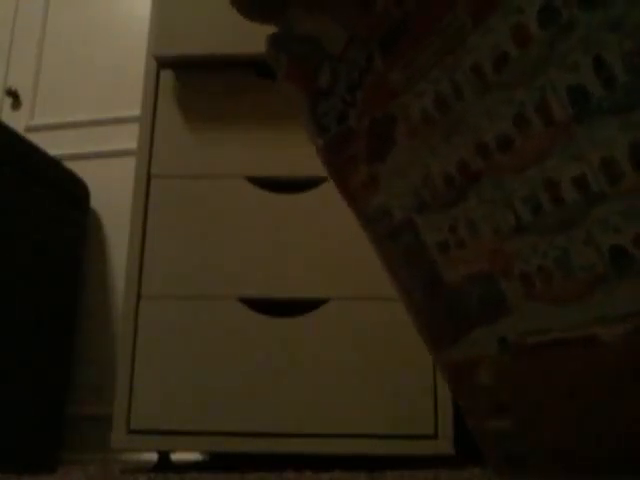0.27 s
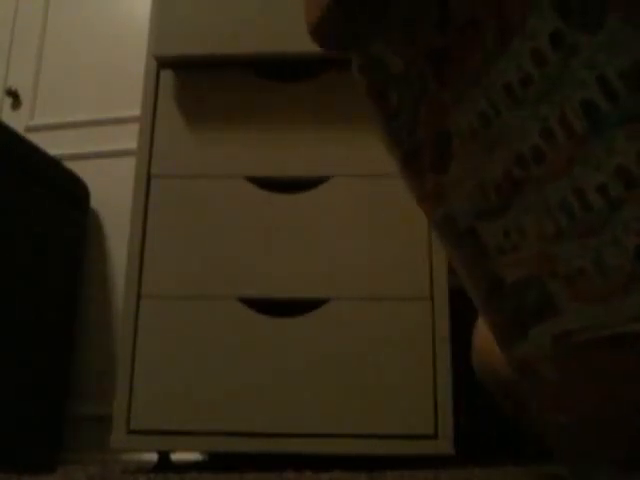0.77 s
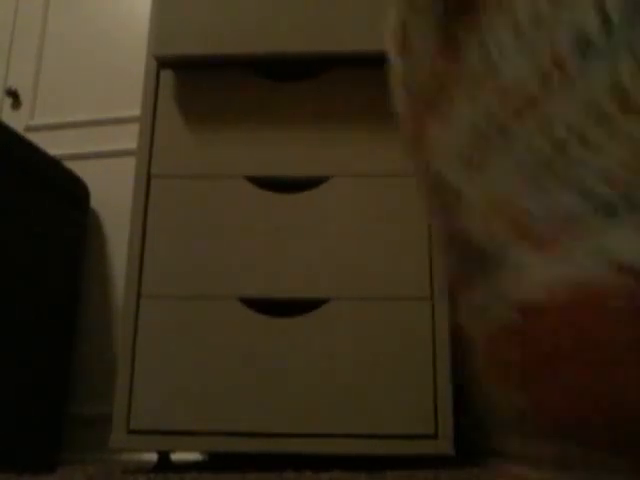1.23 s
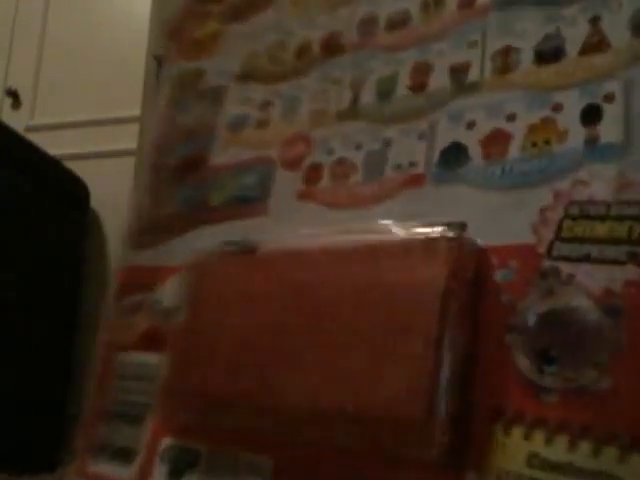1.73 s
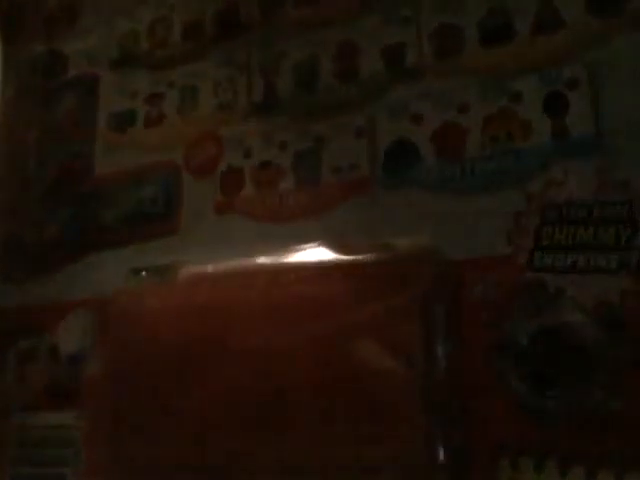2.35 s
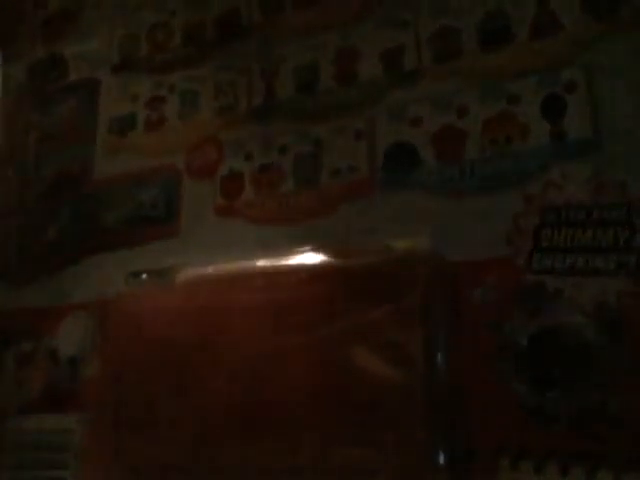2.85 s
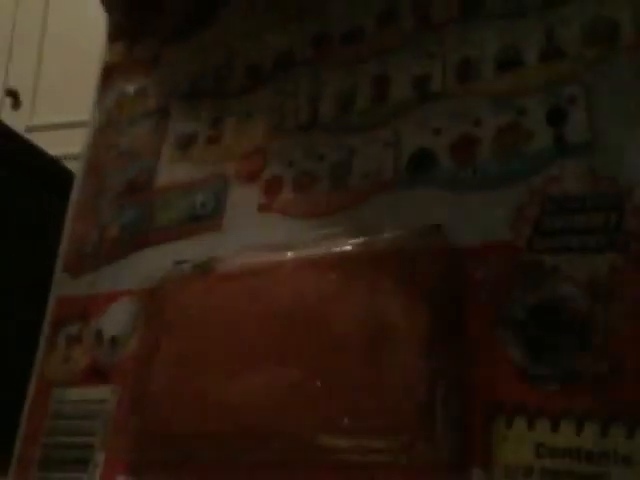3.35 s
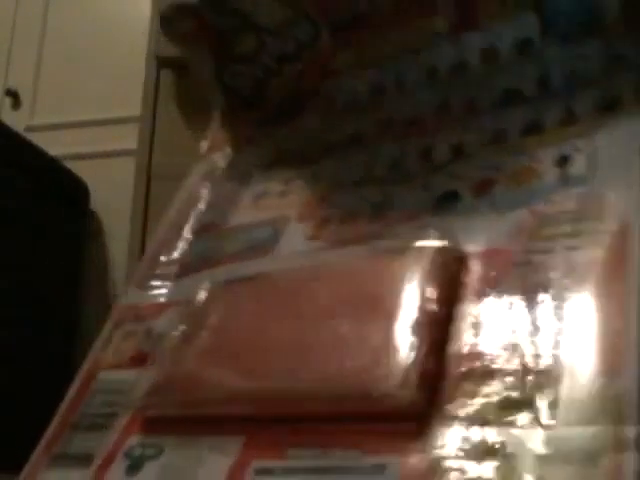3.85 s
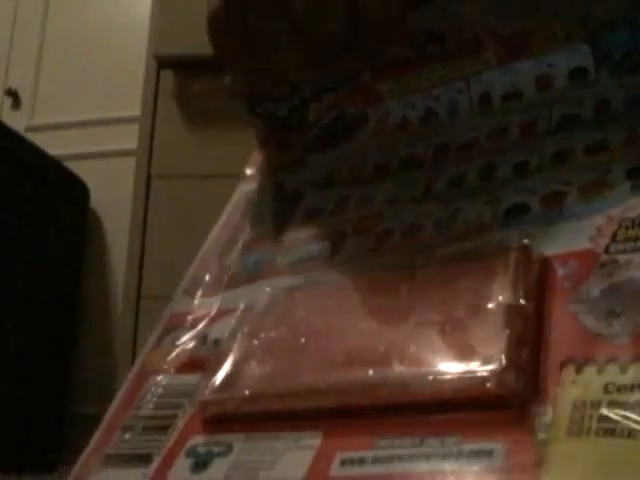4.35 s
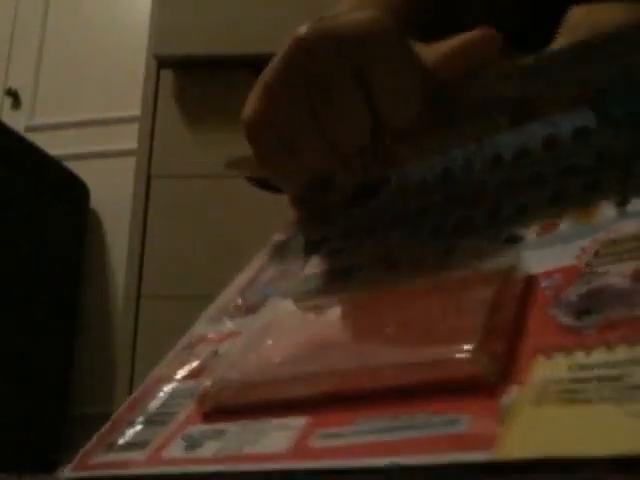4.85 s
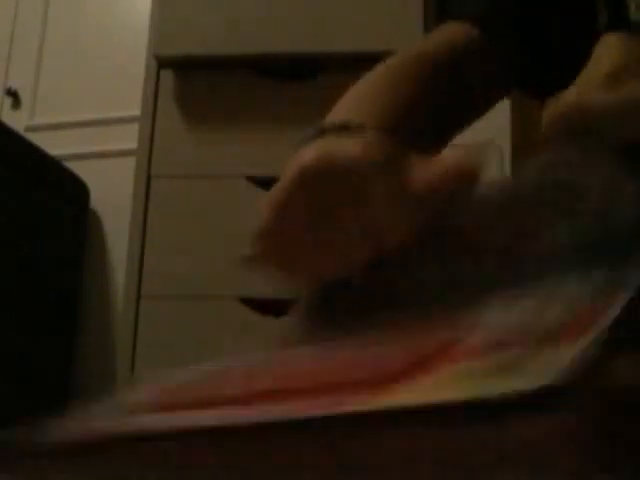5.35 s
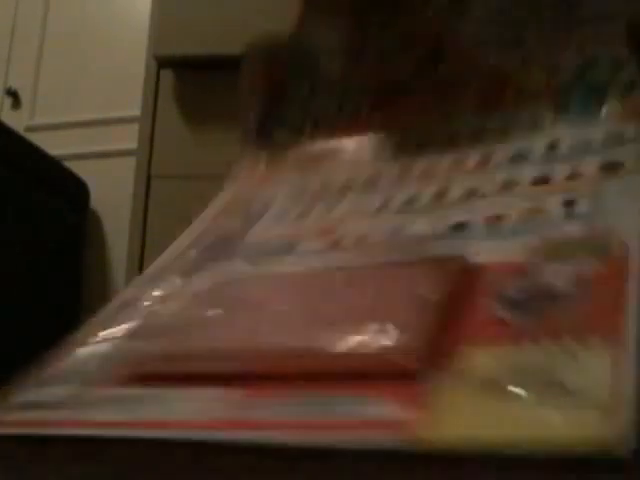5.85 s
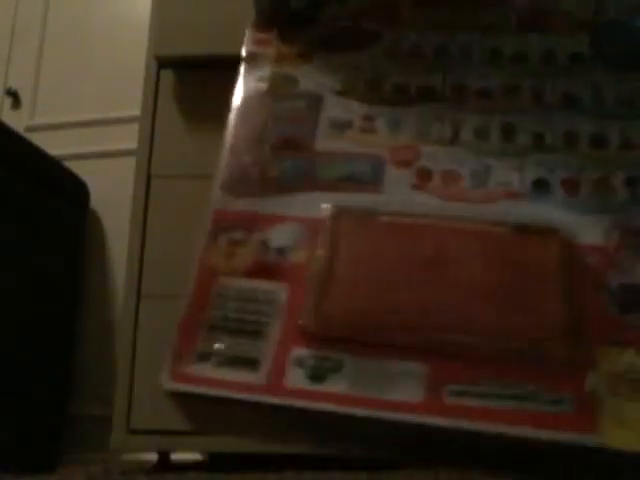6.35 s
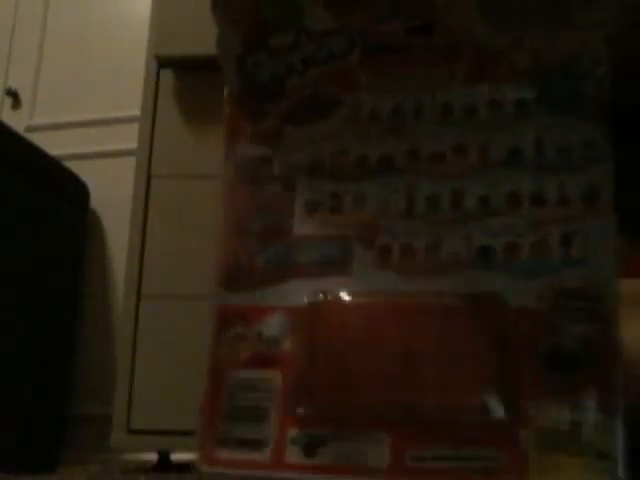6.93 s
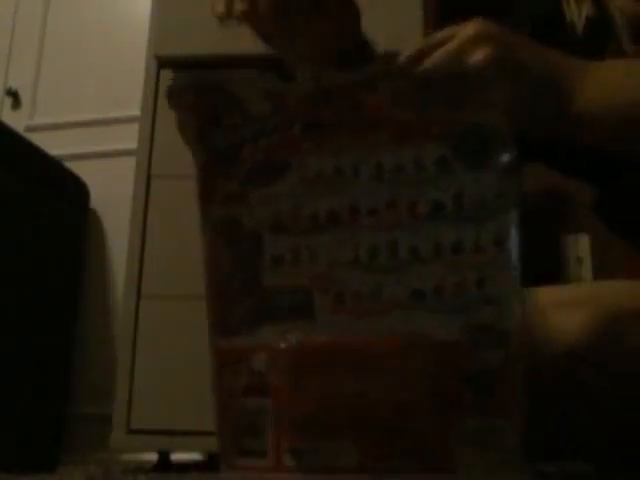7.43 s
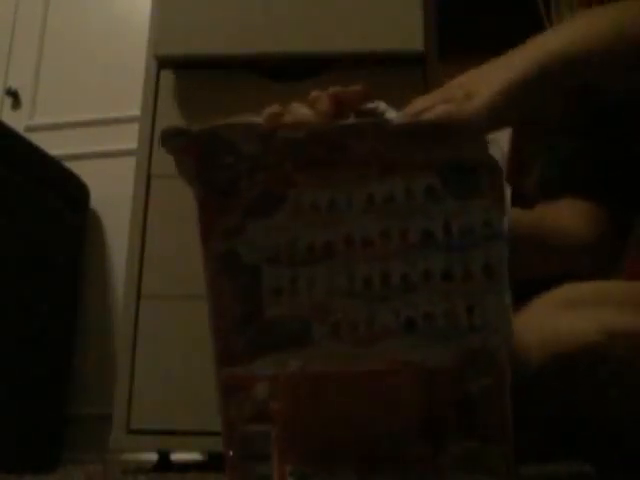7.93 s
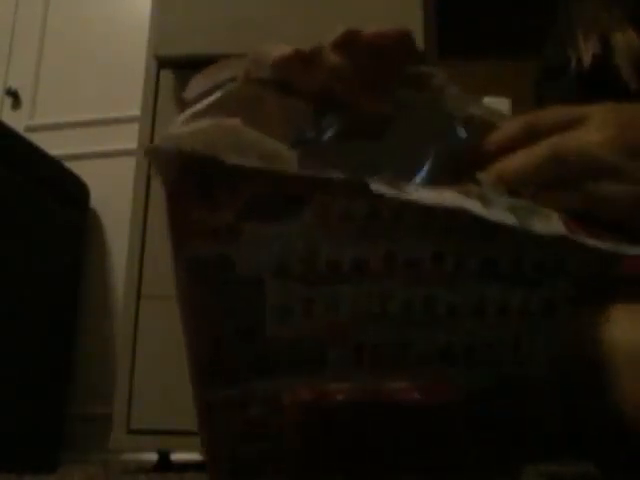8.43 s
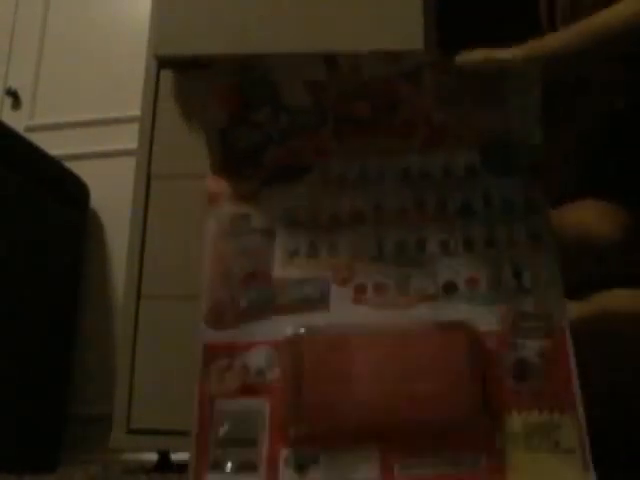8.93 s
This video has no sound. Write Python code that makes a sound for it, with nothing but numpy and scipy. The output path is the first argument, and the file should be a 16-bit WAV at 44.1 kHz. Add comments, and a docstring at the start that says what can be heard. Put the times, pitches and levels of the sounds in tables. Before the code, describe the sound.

Hands bend, peel and tug a plastic-and-card toy package close to the microphone, with crinkles, sharp pops, cracks and short rips in a small room.

```python
"""Hands bend, peel and tear a carded blister pack close to one microphone in a small carpeted room.
Creases that give way set the resonances of card, blister and film ringing: pops, cracks and ticks.
Random small creases and rubbing make the rustle and the rips; jolts make the card creak, gliding
bands of noise are sliding fingers, single notes are panels that pop. Feedback delays give the room;
shaped noise gives the faint hum and hiss below."""
import sys
import numpy as np
from scipy import signal
from scipy.fft import rfft, irfft, next_fast_len
from scipy.io import wavfile
from scipy.ndimage import uniform_filter1d

SR = 44100
rng = np.random.default_rng(int(sys.argv[2]) if len(sys.argv) > 2 else 0)


def unload_audio(sound):
    """Save the sound as a 16-bit wav file, at the path given as the first command line argument."""
    columns = np.transpose(np.atleast_2d(sound))
    # keep every value between -1 and 1, then stretch to whole-number steps
    steps = np.round(np.clip(columns, -1, 1) * 32767)
    wavfile.write(sys.argv[1], SR, steps.astype(np.int16))


N = 404397

# creases that give way, levels ahead of the resonances: t/s, film tick level/dB, card pop level/dB
CREASES = [(0.045, -53, -38.5), (0.115, -53, -42), (0.1984, -36.5, -32.5), (0.322, -70, -34.5),
           (0.334, -37.5, -66), (0.369, -25, -28.5), (0.383, -25, -60), (0.469, -35.5, -39.5),
           (0.514, -26, -61), (0.5874, -31, -48), (0.596, -26, -45), (0.61, -18, -65),
           (0.635, -30.5, -39.5), (0.689, -21, -38), (0.705, -27, -35.5), (0.893, -37, -42),
           (1.2937, -29, -54), (1.483, -49, -39.5), (1.492, -20.5, -33.5), (1.5907, -57, -30.5),
           (1.612, -42, -39.5), (1.6976, -57, -33.5), (1.8, -64, -38.5), (1.889, -42, -30),
           (1.9055, -25.5, -20), (1.9715, -45, -26.5), (2.112, -63, -28), (2.2132, -61, -37),
           (2.252, -63.5, -40.5), (2.278, -49, -43), (2.286, -50, -27), (2.329, -67, -36.5),
           (2.3692, -69, -32), (2.4105, -70, -32.5), (2.4386, -46, -36), (2.543, -18.5, -40),
           (2.5663, -26, -28.5), (2.5913, -59, -31.5), (2.639, -29, -41.5), (2.667, -39, -33),
           (2.677, -15, -53), (2.72, -47, -40.5), (2.7584, -66, -30.5), (2.801, -31.5, -39),
           (2.871, -56.5, -34.5), (2.9125, -30, -34), (2.9403, -23.5, -49), (3.007, -10.5, -9),
           (3.0166, -15.5, -1.5), (3.0238, -11.5, -14), (3.058, -11, -13), (3.067, -12, -18),
           (3.0742, -24.5, -6), (3.085, -10, -32), (3.093, -10, -39), (3.108, -16.5, -32.5),
           (3.079, -17.5, -18), (3.1232, -31.5, -26.5), (3.1494, -23, -16), (3.171, -7, -27),
           (3.165, -40, -15), (3.186, -48, -19), (3.3259, -28.5, -33), (3.3514, -16, -28),
           (3.396, -29.5, -33), (3.4624, -33.5, -29.5), (3.534, -17.5, -28.5), (3.6355, -17.5, -31),
           (3.7628, -11.5, -12.5), (3.9506, -20, -30.5), (3.954, -17.5, -15), (3.9815, -18.5, -50),
           (4.0107, -25, -36), (4.0241, -20, -26), (4.0564, -23, -31.5), (4.095, -25, -28.5),
           (4.102, -27.5, -29.5), (4.126, -19, -29), (4.2015, -27, -28.5), (4.254, -20, -29),
           (4.3034, -26.5, -41), (4.3361, -29, -33), (4.3845, -12, -35), (4.477, -7.5, -6),
           (4.6454, -39, -31), (4.682, -36.5, -29), (4.763, -10.5, -16.5), (4.81, -19, -29.5),
           (4.815, -31, -21), (4.824, -16.5, -17), (4.861, -29, -11), (4.881, -16, -41.5),
           (4.893, -1.5, -7.5), (4.92, -7.5, -8), (5.0526, -29.5, -35), (5.218, -24, -25.5),
           (5.2561, -11, -71.5), (5.289, -22, -47.5), (5.3449, -7.5, -26), (5.3507, -6.5, -23),
           (5.4932, -23, -64), (5.653, -48, -23.5), (5.7032, -12, -71), (5.8195, -30, -42),
           (5.9371, -28, -46), (5.98, -53, -28.5), (6.117, -37.5, -51), (6.2705, -17, -34.5),
           (6.4408, -35, -61), (6.488, -40, -44), (6.51, -30.5, -41), (6.561, -37.5, -44.5),
           (6.69, -30.5, -67), (6.7147, -43, -41.5), (6.889, -33, -37.5), (6.897, -42.5, -27.5),
           (6.99, -29, -31.5), (7.227, -43.5, -38), (7.2358, -31, -32.5), (7.2965, -33, -27.5),
           (7.314, -35.5, -44.5), (7.3541, -23, -29), (7.3963, -44.5, -31.5), (7.4241, -36, -30),
           (7.633, -37.5, -42.5), (7.7104, -23.5, -26.5), (7.9289, -22, -30), (8.0593, -36.5, -41),
           (8.24, -30.5, -34.5), (8.267, -34, -36.5), (8.278, -31.5, -41.5), (8.407, -36, -35),
           (8.446, -41, -38.5), (8.491, -50, -25), (8.504, -54, -38.5), (8.804, -20.5, -20),
           (8.8351, -30.5, -31.5), (8.99, -36.5, -26), (9.006, -28, -21.5), (9.033, -46, -32.5),
           (9.1151, -6, -18), (9.128, -10.5, -40.5)]
# resonances of the card: f/Hz, level/dB, t60/s
CARD_MODES = [(167, -6.5, 0.16), (267.6, 2.5, 0.029), (381.7, 1.5, 0.028), (520, 6, 0.011), (710, 8, 0.011),
              (850, 7, 0.011), (1080, 5, 0.013), (1197, 6, 0.0085), (1537, 5, 0.0072)]
# tugs that make the sheets rustle or rip: start t/s, hold t/s, film level/dB, blister level/dB,
# card level/dB, bent card f/Hz
PULLS = [(0.201, 0.017, -40, -64, -39.5, 764), (0.36, 0.06, -40, -49.5, -42.5, 814),
         (0.572, 0.088, -56, -46, -50.5, 600), (0.665, 0.066, -41.5, -43, -41.5, 770),
         (1.216, 0.041, -52.5, -54.5, -49, 466), (1.29, 0.051, -53, -49.5, -61, 750),
         (1.901, 0.021, -50.5, -53.5, -39, 540), (1.99, 0.059, -52.5, -56, -40, 384),
         (2.525, 0.052, -49.5, -45.5, -50, 1010), (2.634, 0.075, -38, -71.5, -53.5, 650),
         (3.013, 0.0044, -11, -19.5, -18, 620), (3.025, 0.049, -24, -30.5, -18.5, 980),
         (3.152, 0.018, -50.5, -56.5, -31.5, 666), (3.208, 0.0093, -42.5, -39, -35.5, 695),
         (3.356, 0.016, -43, -40.5, -39.5, 650), (3.722, 0.055, -32, -41, -42.5, 533),
         (4.081, 0.053, -42, -49, -54, 890), (4.476, 0.0091, -25.5, -33.5, -25, 910),
         (4.668, 0.11, -49.5, -49, -41, 885), (4.78, 0.06, -37.5, -37.5, -31, 1020),
         (4.887, 0.065, -38.5, -39, -38, 710), (5.194, 0.044, -40.5, -44, -48.5, 784),
         (5.335, 0.024, -23.5, -28, -35.5, 1010), (5.371, 0.037, -32.5, -38.5, -36.5, 796),
         (5.402, 0.048, -44.5, -53, -41.5, 350), (5.617, 0.013, -41.5, -43, -47, 564),
         (5.895, 0.075, -48, -51, -46, 880), (6.271, 0.0058, -37.5, -50.5, -42.5, 950),
         (6.887, 0.03, -41, -51.5, -42, 634), (6.973, 0.013, -48, -51, -48.5, 660),
         (7.235, 0.21, -53, -50.5, -47, 760), (7.606, 0.027, -59, -54, -48.5, 660),
         (7.828, 0.025, -47, -53, -70, 670), (8.242, 0.023, -47.5, -43.5, -47, 1000),
         (8.695, 0.09, -39, -42.5, -42.5, 1040), (8.976, 0.028, -40.5, -41.5, -32.5, 480),
         (9.115, 0.011, -26.5, -46.5, -47, 660)]


def pack():
    """Film, blister and card are three sets of resonances, creased and rubbed by the same hands."""
    # resonances of the thin film: f/Hz, level/dB, t60/s
    film_modes = [(4660, 2, 0.002), (5565, 2.5, 0.0042), (6390, 8, 0.0022), (7330, 6.5, 0.0023),
                  (8270, 2.5, 0.0021), (9760, -7.5, 0.0029), (10300, -13.5, 0.0046)]
    # resonances of the stiff blister: f/Hz, level/dB, t60/s
    blister_modes = [(1900, 4, 0.0035), (2570, 4, 0.0039), (3186, 5.5, 0.0026), (4410, 3, 0.0027)]
    # steady grip, straight lines between rows: t/s, film crinkle level/dB, card rustle level/dB, bent card f/Hz
    grip = [(0.0, -59, -58, 520), (0.5, -49.5, -53.5, 635), (0.8, -66, -54, 585), (1.1, -80, -103, 520),
            (1.45, -76.5, -68, 600), (1.7, -57.5, -52.5, 490), (2.16, -56.5, -54, 520),
            (2.5, -44, -51.5, 575), (2.98, -45, -52.5, 590), (3.28, -53.5, -45.5, 680),
            (3.62, -55.5, -52, 630), (3.85, -45.5, -44.5, 700), (4.25, -39.5, -53.5, 860),
            (4.45, -46.5, -47.5, 850), (4.63, -60.5, -56, 900), (5.15, -52, -51, 796),
            (5.5, -45, -49.5, 574), (5.9, -50.5, -55, 650), (6.07, -61, -62, 606), (6.24, -62.5, -60, 603),
            (6.64, -62, -62.5, 615), (7.18, -59, -55, 692), (7.551, -82, -74, 598), (7.65, -49.5, -50, 660),
            (8.01, -49, -53, 694), (8.301, -49.5, -47, 660), (8.57, -55.5, -55.5, 710),
            (9.17, -43.5, -41.5, 700)]
    blister_like_film, blister_below_db = 0.23, 4.5   # share of the film's level in the blister's; offset

    t = np.arange(N) / SR
    grip_s, *columns = np.transpose(grip)
    film_db, card_db, card_hz = [np.interp(t, grip_s, column) for column in columns]
    blister_db = card_db + blister_like_film * (film_db - card_db) - blister_below_db

    _, _, film_tug_db, blister_tug_db, card_tug_db, _ = np.transpose(PULLS)
    film_db, _ = tugged(t, film_db, film_tug_db)
    blister_db, _ = tugged(t, blister_db, blister_tug_db)
    card_db, card_hz = tugged(t, card_db, card_tug_db, card_hz)

    _, tick_db, pop_db = np.transpose(CREASES)
    crack_db = 0.5 * tick_db + 0.46 * pop_db   # the blister shares in both
    pops = snaps(CARD_MODES, pop_db, length_ms=3.0, follow=0.022, spread_db=3.0, centre_hz=card_hz)
    cracks = snaps(blister_modes, crack_db, length_ms=3.54, follow=0.056, spread_db=3.5)
    ticks = snaps(film_modes, tick_db, length_ms=1.66, follow=0.084, spread_db=3.0)

    clumps = drift(57.0)   # one jerky motion drives all three sheets
    crinkle = rustle(film_modes, settling(film_db, tick_db - 24.0, t60=0.14), clumps,
                     per_s=1400, uneven_db=2.0, rub_db=-5, clump_db=1.6)
    crackle = rustle(blister_modes, settling(blister_db, crack_db - 32.0, t60=0.017), clumps,
                     per_s=820, uneven_db=3.0, rub_db=-7, clump_db=3.5)
    scuff = rustle(CARD_MODES, settling(card_db, pop_db - 14.5, t60=0.078), clumps,
                   per_s=300, uneven_db=4.0, rub_db=-4, clump_db=3.0, centre_hz=card_hz)
    creased = pops + cracks + ticks
    rustling = crinkle + crackle + scuff
    return creased + rustling + creaks(card_hz) + slides(t, clumps) + pings()


def snaps(modes, snap_db, length_ms, follow, spread_db, centre_hz=None):
    """A faint swell of small clicks leads into one sharp click, then a dying run of smaller ones."""
    snap_s = np.array(CREASES)[:, 0]
    lag = np.arange(-130, 900)   # samples from the sharp click
    chance = rng.standard_normal((len(snap_s), len(lag)))
    lead_in = .25 * np.exp(np.minimum(lag, 0) / 40)
    fade = np.exp(-lag / (length_ms * SR / 1000))
    # cubing leaves a few strong slips among many weak ones
    run = follow * chance ** 3 * np.where(lag < 0, lead_in, fade)
    run[:, lag == 0] = 1
    run_size = np.sqrt(np.sum(run ** 2, axis=1, keepdims=True))

    # every crease excites the modes in its own proportions
    balance = from_db(spread_db * rng.standard_normal((len(snap_s), len(modes))))
    strength = rms_one(balance, axis=1) * from_db(snap_db)[:, None] / run_size

    at = (np.round(snap_s * SR).astype(int)[:, None] + lag).ravel()
    out = 0
    for k, (hz, level_db, t60) in enumerate(modes):
        clicks = np.bincount(at, (run * strength[:, [k]]).ravel(), N + len(lag))[:N]
        sign = (-1) ** k
        out = out + sign * from_db(level_db) * ring(clicks * favoured(hz, centre_hz), hz, t60)
    return out


def rustle(modes, level_db, clumps, per_s, uneven_db, rub_db, clump_db, centre_hz=None):
    """Small creases at random, in clumps, denser under more force (a rip), over a steady rub of surfaces."""
    shift_db, shift_hz = 2.5, 9.0   # spread and corner of each mode's own swelling
    sizes = from_db(uneven_db * np.minimum(rng.exponential(1, N), 3)) * rng.choice([-1, 1], N)
    rate = per_s * from_db(.6 * np.maximum(level_db + 45.0, -9.0))   # per_s holds at -45 dB
    happens = rng.random(N) < rate / SR
    grains = rms_one(sizes * happens / np.sqrt(rate))
    out = 0
    for hz, mode_db, t60 in modes:
        # in each stretch of 16 samples the grains reach a mode or miss it
        moved = np.repeat(rng.random(N // 16 + 1) < .5, 16)[:N]
        force = grains * moved + from_db(rub_db) * rng.standard_normal(N)
        # each mode swells and fades on its own as the sheet flexes
        force = force * from_db(shift_db * drift(shift_hz))
        force = force * from_db(clump_db * clumps) * favoured(hz, centre_hz)
        out = out + from_db(mode_db) * ring(force, hz, t60)
    # level the sound over some 80 ms, so that level_db alone sets the slow course
    evened = out / np.sqrt(uniform_filter1d(out ** 2, size=3500) + 1e-12)
    return from_db(level_db) * evened


def settling(level_db, peak_db, t60):
    """After a crease gives, the sheet around it goes on rustling and dies down."""
    power = np.zeros(N)
    power[np.round(np.array(CREASES)[:, 0] * SR).astype(int)] = from_db(2 * peak_db)
    decay = np.exp(-2 * np.log(1000) / (t60 * SR))
    power = signal.lfilter([1], [1, -decay], power + 1e-18)
    return 10 * np.log10(from_db(2 * level_db) + power)


def tugged(t, steady_db, tug_db, steady_hz=0):
    """Each tug rises fast, holds and dies away over the steady level; pitch goes with the stronger force."""
    rise_db_per_s, fall_db_per_s = 2399.5, 323.5
    power = from_db(2 * steady_db)
    pitch = power * steady_hz
    for (start, hold, *_, hz), level_db in zip(PULLS, tug_db):
        near = slice(max(int((start - .1) * SR), 0), int((start + hold + .4) * SR))
        early = np.maximum(start - t[near], 0)
        late = np.maximum(t[near] - start - hold, 0)
        tug = from_db(2 * (level_db - rise_db_per_s * early - fall_db_per_s * late))
        power[near] += tug
        pitch[near] += tug * hz
    return 10 * np.log10(power), pitch / power


def favoured(hz, centre_hz):
    """Bending the card favours the modes near its pitch; without a pitch all modes are alike."""
    return 1 if centre_hz is None else from_db(-5.0 * np.log2(hz / centre_hz) ** 2)


def creaks(centre_hz):
    """Stick and slip of the card's edge: soft, nearly even jolts into the card's resonances."""
    # drags of the edge: start t/s, end t/s, slips per s, jolt level/dB
    drags = [(1.974, 2.075, 93, -35)]
    jolts = np.zeros(N)
    for start, end, per_s, level_db in drags:
        slip_s = np.arange(start, end, 1 / per_s)
        chance = rng.standard_normal((40, 2))[:len(slip_s)]
        at = ((slip_s + .0008 * chance[:, 0]) * SR).astype(int)
        jolts[at] = from_db(level_db + 2.7 * chance[:, 1])
    out = 0
    for k, (hz, level_db, t60) in enumerate(CARD_MODES):
        sign = (-1) ** k
        out = out + sign * from_db(level_db) * ring(jolts * favoured(hz, centre_hz), hz, t60)
    return out


def slides(t, clumps):
    """Fingers slide on the film: friction noise in one narrow resonance that glides, fading in and out."""
    # strokes of the fingers: start t/s, end t/s, from f/Hz, to f/Hz, level/dB
    strokes = [(0.58, 0.664, 4850, 4700, -50), (0.61, 0.669, 2680, 2065, -49),
               (1.314, 1.369, 2730, 2410, -46), (1.308, 1.368, 4550, 5260, -42.5),
               (3.861, 4.451, 2007, 2222, -49), (3.862, 4.399, 903, 970, -49),
               (5.447, 6.048, 1893, 1880, -56)]
    width, fade = 0.14, 0.09   # shares of the starting pitch and of the stroke's length
    out = 0
    for start, end, from_hz, to_hz, level_db in strokes:
        on = np.clip(np.minimum(t - start, end - t) / (fade * (end - start)), 0, 1)
        phase = 2 * np.pi * np.cumsum(np.interp(t, [start, end], [from_hz, to_hz])) / SR
        # two slow noises carried by cosine and sine make a band around the pitch
        r = np.exp(-np.pi * width * from_hz / SR)
        a, b = signal.lfilter([1], [1, -r], rng.standard_normal((2, N)) * from_db(2.5 * clumps))
        out = out + from_db(level_db) * on * rms_one(a * np.cos(phase) + b * np.sin(phase))
    return out


def pings():
    """A panel pops: each pop sets one clear note ringing briefly."""
    # popping panels: t/s, f/Hz, level/dB
    notes = [(0.657, 2250, -30), (1.371, 396, -39), (2.640, 590, -24.5), (3.217, 1760, -25),
             (3.306, 537, -39)]
    out = 0
    for s, hz, level_db in notes:
        click = from_db(level_db) * (np.arange(N) == int(s * SR))
        out = out + ring(click, hz, t60=.03)
    return out


def room(x):
    """Fourteen feedback delays stand for the reflections, duller on every round."""
    t60_s, level_db, wall_cut_hz = 0.15, -28, 12000   # t60 ahead of the dulling
    size = next_fast_len(N + SR)
    w = 2 * np.pi * np.arange(size // 2 + 1) / size
    dull = 1 / (1 + 1j * w * SR / (2 * np.pi * wall_cut_hz))
    walls = 0
    for k, lag in enumerate(np.geomspace(290, 1150, 14).astype(int)):   # delays in samples
        once = np.exp(-np.log(1000) * lag / SR / t60_s - 1j * w * lag) * dull
        walls = walls + (-1) ** k * once / (1 - once)   # sum of all rounds
    return from_db(level_db) * irfft(rfft(x, size) * walls, size)[:N]


def hum():
    """House rumble and microphone hiss: steady noise shaped by one spectrum."""
    # relative spectrum of the background: f/Hz, level/dB per Hz
    spectrum = [(30, -18), (60, -7), (110, 0.5), (250, -6.5), (430, -11), (1800, -22), (6300, -21),
                (11000, -26.5), (15000, -30)]
    spectrum_hz, spectrum_db = np.transpose(spectrum)
    hz = np.maximum(np.arange(N // 2 + 1) * SR / N, 10)
    shape = from_db(np.interp(np.log(hz), np.log(spectrum_hz), spectrum_db))
    noise = irfft(rfft(rng.standard_normal(N)) * shape, N)
    return from_db(-58.5) * rms_one(noise)


def ring(clicks, hz, t60):
    """A resonance: a unit click sets a sine of height about 1 ringing, 60 dB down after t60 seconds."""
    r = np.exp(-np.log(1000) / (t60 * SR))
    w = 2 * np.pi * hz / SR
    return signal.lfilter([0, np.sin(w)], [1, -2 * r * np.cos(w), r * r], clicks + 1e-18)


def drift(corner_hz):
    """Slow chance: coarse noise through a double one-pole low-pass; spread 1."""
    r = np.exp(-80 * np.pi * corner_hz / SR)   # one value every 40 samples
    noise = rng.standard_normal(N // 40 + 2002)
    slow = signal.lfilter([1], [1, -2 * r, r * r], noise)[2000:]   # skips the filter's start
    return np.interp(np.arange(N) / 40, np.arange(len(slow)), rms_one(slow))


def from_db(db):
    """Gain of a level."""
    return 10 ** (np.asarray(db) / 20)


def rms_one(x, axis=None):
    """Scale to unit rms."""
    return x / np.sqrt(np.mean(x ** 2, axis=axis, keepdims=True) + 1e-20)


def scene():
    """One close microphone, its low bass cut for the pack, feeds both channels."""
    low_cut = signal.butter(2, 148, "high", fs=SR, output="sos")   # Hz
    near = signal.sosfilt(low_cut, pack())
    return np.tile(near + room(near) + hum(), (2, 1))


def record(dry):
    """Peaks beyond full scale clip, then a steep low-pass cuts the top."""
    clipped = np.clip(dry, -1, 1)
    top_cut = signal.cheby2(12, 70, 15600, fs=SR, output="sos")   # 70 dB down from 15600 Hz up
    return signal.sosfilt(top_cut, clipped)


dry = scene()
out = record(dry)
unload_audio(out)
```